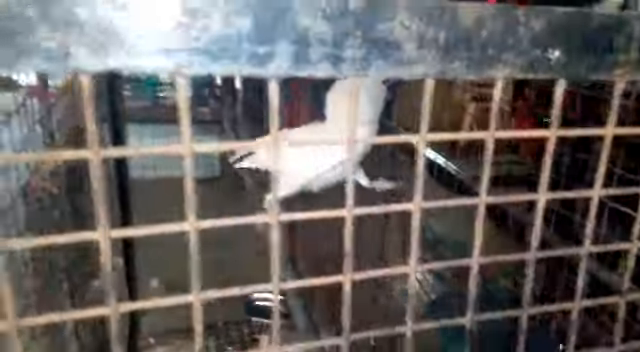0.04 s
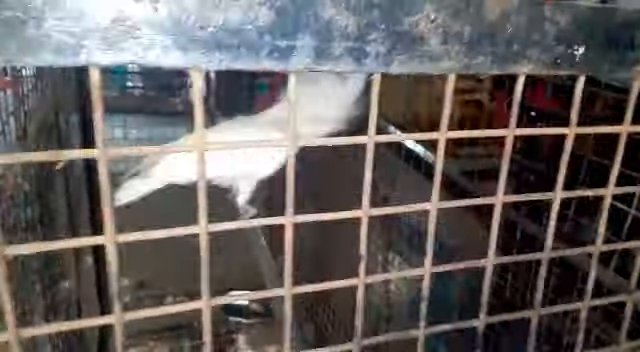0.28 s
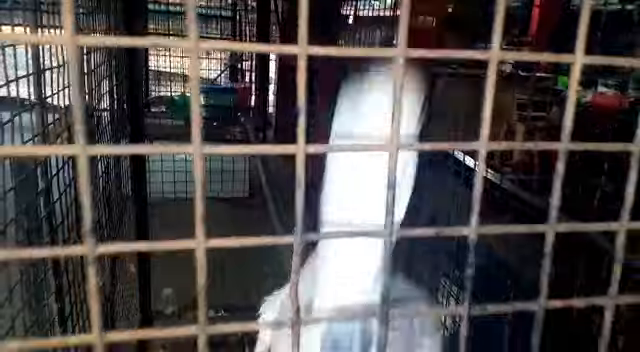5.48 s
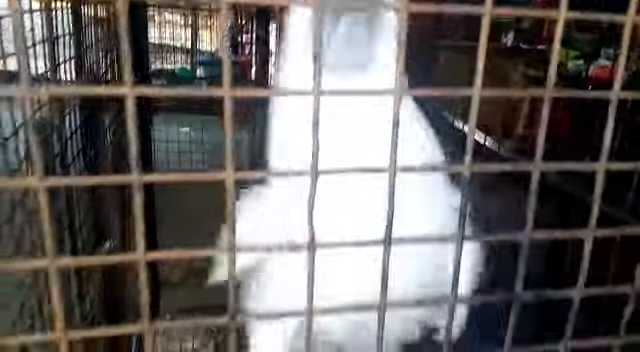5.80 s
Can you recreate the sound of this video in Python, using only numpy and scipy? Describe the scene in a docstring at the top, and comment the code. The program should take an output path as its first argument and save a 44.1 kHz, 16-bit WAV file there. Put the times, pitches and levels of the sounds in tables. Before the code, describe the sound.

Small birds chirp faintly, then a nearby caged cockatoo lets out a run of loud, rasping squawks and a final shriek.

```python
"""Over the steady noise of a hard, echoing room, small birds chirp faintly in the distance.
After a second, a cockatoo in a wire cage close to the microphone screeches ten harsh squawks: membranes
in its voice box slap chaotically, and its throat is more strained each time. The loud calls overload
the recorder, which turns them down and clips their peaks. The bird ends on one clear, arched shriek."""
import sys
import numpy as np
from scipy import signal
from scipy.fft import rfft, irfft
from scipy.io import wavfile
from scipy.ndimage import uniform_filter1d, minimum_filter1d, map_coordinates

SR = 44100
rng = np.random.default_rng(int(sys.argv[2]) if len(sys.argv) > 2 else 0)


def unload_wav(signal):
    """Save mono or channel-first audio to the path in sys.argv[1] as 16-bit WAV at rate SR, clipped to [-1, 1]."""
    wavfile.write(
        sys.argv[1],
        SR,
        np.round(np.clip(np.atleast_2d(signal).T, -1, 1) * 32767).astype(np.int16),
    )


N = 257984


def amp(db):
    """Turn decibels into a number to multiply by."""
    return 10 ** (np.asarray(db) / 20)


def unit(x):
    """Scale a sound to an average (rms) size of 1."""
    return x / np.sqrt(np.mean(x ** 2) + 1e-20)


def along(points, hz):
    """Read between rows of (Hz, value), with octaves evenly spaced."""
    row_hz, values = np.transpose(points)
    return np.interp(np.log(hz + 1), np.log(row_hz), values)


def wobble(rate, n):
    """A smooth random curve of n samples, passing through `rate` random values a second."""
    return map_coordinates(rng.standard_normal(int(n * rate / SR) + 4), [np.arange(n) * rate / SR])


def coloured(x, gain, size=4096):
    """Make each frequency of x louder or softer by gain(Hz)."""
    cepstrum = irfft(np.log(np.maximum(gain(np.fft.rfftfreq(size, 1 / SR)), 1e-6)))
    # this fold makes the filter ring only after a sound, never before it
    cepstrum[1:size // 2] *= 2
    cepstrum[size // 2 + 1:] = 0
    return signal.fftconvolve(x, irfft(np.exp(rfft(cepstrum))))[:len(x)]


# The tone of the background noise. Each row: frequency in Hz, relative level in dB.
NOISE_COLOUR = [(25, -21), (60, -21), (110, 2), (270, -8.5), (420, -7), (700, -2.5), (1000, -11),
                (1550, -12), (1900, -9.5), (2650, -3.5), (2900, 6.5), (3300, -7), (9000, -25.5),
                (11500, -25)]
def room_noise(level_db=-57.5):
    """A faint, steady noise whose level drifts slightly."""
    noise = coloured(rng.standard_normal(N), lambda hz: amp(along(NOISE_COLOUR, hz)))
    return unit(noise) * amp(level_db + wobble(5.33, N))


# The small birds' chirps. Each row: start in seconds, length in seconds, first pitch in Hz,
# last pitch in Hz, relative level in dB.
CHIRPS = [(0, 0.065, 3740, 3530, -49.5), (0.066, 0.079, 4900, 5200, -43.5), (0.1, 0.07, 6500, 6930, -40),
          (0.142, 0.054, 5980, 5640, -49), (0.183, 0.066, 3190, 3250, -48.5),
          (0.287, 0.028, 8860, 10400, -52), (0.358, 0.025, 3070, 3100, -45.5),
          (0.367, 0.043, 4540, 4340, -53.5), (0.48, 0.055, 5600, 5600, -58),
          (0.535, 0.042, 4100, 4060, -55)]
def small_birds(waver=0.0396, overtone_db=-15):
    """Short, wavering whistles, each with a weak tone an octave above."""
    out = np.zeros(N)
    for start, length, from_hz, to_hz, db in CHIRPS:
        n = int(length * SR)
        pitch = np.linspace(from_hz, to_hz, n) * (1 + waver * wobble(904, n))
        phase = 2 * np.pi * np.cumsum(pitch) / SR
        whistle = np.sin(phase) + amp(overtone_db) * np.sin(2 * phase)
        out[round(start * SR):][:n] += amp(db) * unit(np.hanning(n) ** .5 * whistle)
    return out


# How long the room rings. Each row: frequency in Hz, seconds to fade by 60 dB.
RING_TIMES = [(300, 0.53), (2200, 0.68), (5000, 0.51), (10000, 0.39)]
def room_echo(x, build_s=0.0034):
    """The room's echo builds up quickly; each frequency dies away at its own speed."""
    hz, t, noise = signal.stft(rng.standard_normal(SR), SR, nperseg=256)
    fade = amp(-60 * t / along(RING_TIMES, hz)[:, None])
    build = 1 - np.exp(-t / build_s)
    tail = signal.istft(noise * fade * build, SR, nperseg=256)[1]
    return signal.fftconvolve(x, tail / np.linalg.norm(tail))[:N]


def voice_box(n, slap_hz=569, scatter=.14):
    """Membranes slap chaotically: uneven pulses, each with a puff of rushing air."""
    slap_rate = slap_hz * np.exp(.06 * wobble(45, n) + scatter * wobble(700, n))
    cycles = np.cumsum(slap_rate) / SR
    slaps = np.diff(np.floor(cycles), prepend=0) * amp(-wobble(600, n))  # sizes vary by about 1 dB
    puffs = rng.standard_normal(n) * np.cos(np.pi * cycles) ** 2
    return (unit(slaps - slaps.mean()) + unit(puffs)) * amp(-wobble(237.3, n))


# Resonances: the pitches that throat and beak boost. The third is the main one, the fourth is nasal.
# Each row: relaxed pitch in Hz, relaxed level in dB, strained pitch in Hz, strained level in dB,
# width in Hz.
RESONANCES = [(1404, -6, 1207, -20, 207), (1940, -16.5, 1634, -4.5, 366), (2378, -1, 2270, -1, 356),
              (3400, -5.5, 3367, -16, 740), (5160, -7.5, 5030, -8, 943), (9170, -26.5, 7370, -14, 1070),
              (9800, -23, 9420, -25, 940)]
def resonances_at(strain, treble_db, nasal_db, treble_hz=3900):
    """Strain draws every resonance from its relaxed place towards its strained place."""
    relaxed_hz, relaxed_db, strained_hz, strained_db, width = np.transpose(RESONANCES)
    hz = relaxed_hz * (strained_hz / relaxed_hz) ** strain
    db = relaxed_db + (strained_db - relaxed_db) * strain
    db += treble_db / (1 + (treble_hz / hz) ** 6)
    db[3] += nasal_db
    return np.column_stack([hz, db, width])


def throat(hz, resonances, low_hz=1080, high_hz=10700, steep=2.89, chest_db=-31):
    """How much of each frequency the throat passes: steep-sided peaks over a weak, broad low one."""
    power = sum(amp(db) ** 2 / (1 + np.abs(2 * (hz - centre) / width) ** steep)
                for centre, db, width in resonances)
    band = 1 / (1 + (low_hz / (hz + 1)) ** 14) / (1 + (hz / high_hz) ** 50)
    chest = amp(chest_db) ** 2 / (1 + ((hz - 850) / 280) ** 4)
    return np.sqrt(power * band + chest)


def piercing_tone(n, hz, waver=0.01318, shiver=0.0227, fading_db=2, lower_db=-7):
    """The membranes lock onto the main resonance; a weaker tone sounds at 3/4 of its pitch."""
    pitch = hz * (1 + waver * wobble(49.26, n) + shiver * wobble(604.6, n))
    phase = 2 * np.pi * np.cumsum(pitch) / SR
    main, lower = (unit(amp(fading_db * wobble(110.1, n))) for _ in range(2))
    return unit(main * np.sin(phase) + amp(lower_db) * lower * np.sin(phase * 3 / 4))


def roof_echo(x, typical_delay_s=.0031, share=0.43, retreat=0.554):
    """As the head dips, the cage roof's echo comes later, so the pitches it boosts slide down."""
    t = np.arange(len(x)) / SR
    delay = typical_delay_s * (1 + rng.normal(0, 0.0809)) * (1 + retreat * t)
    return x + share * map_coordinates(x, [(t - delay) * SR], order=3)


# The ten squawks. Each row: start in seconds, end in seconds, level in dB, piercing tone against the
# rasp in dB, throat strain from 0 to 1, treble boost in dB, nasal boost in dB.
SQUAWKS = [(1.011, 1.296, -10, -9, 0.07, -3, -1), (1.508, 1.798, -7.5, -10.5, 0.23, -2, 1.5),
           (2.035, 2.305, -6, -25, 0.34, 0.5, -0.5), (2.522, 2.773, -5, -23, 0.4, 1, -4),
           (2.993, 3.238, -3.5, -16, 0.57, -0.5, -2.5), (3.444, 3.655, -2, -15, 0.76, 0.5, 1.5),
           (3.851, 4.076, -2, -13, .83, 0.5, 0.5), (4.275, 4.495, -0.5, -6, .88, 0, 2),
           (4.687, 4.909, -1, -3.5, 0.9, -5.5, 1), (5.123, 5.323, -1, -18, 0.97, -3.5, -8)]
def squawks(scoop=0.11, sag=.016, flutter_db=0.45, onset_db=-21, opening_s=0.00043, release_s=0.027,
            relaxed_swell_s=0.079, strained_swell_s=0.032):
    """Each squawk scoops up as it swells (faster when strained), sinks a little, and is cut off."""
    out, n = np.zeros(N + SR), SR // 2
    t = np.arange(n) / SR
    for start, end, db, tone_db, strain, treble_db, nasal_db in SQUAWKS:
        length = end - start
        resonances = resonances_at(strain, treble_db, nasal_db)
        swell_s = relaxed_swell_s * (strained_swell_s / relaxed_swell_s) ** strain
        swell_left = np.maximum(1 - t / swell_s, 0)
        rasp = unit(coloured(voice_box(n), lambda hz: throat(hz, resonances)))
        tone = amp(tone_db) * piercing_tone(n, resonances[2, 0])
        voice = (rasp + tone) * amp(flutter_db * wobble(66, n))
        # the tightening throat carries pitch and resonances along together
        sinking = sag * (1 - 2 * np.minimum(t / length, 1))
        speed = 1 - scoop * swell_left ** 2 + sinking + .006 * wobble(30.41, n)
        voice = map_coordinates(voice, [np.cumsum(speed)], order=5)
        effort_db = onset_db * swell_left ** 1.16 - 60 * np.maximum(t - length, 0) / release_s
        loudness = amp(db + effort_db) * np.minimum(t / opening_s, 1)
        out[round(start * SR):][:n] += unit(roof_echo(voice)) * loudness
    return out[:N]


def near_walls(x, echo_db=-20, count=9):
    """The walls around the cage add weak, early copies to the sound."""
    out = x.copy()
    for delay_s in rng.uniform(.002, 0.017, count):
        out += amp(echo_db) * rng.choice([-1, 1]) * np.pad(x, (int(delay_s * SR), 0))[:N]
    return out / np.sqrt(1 + count * amp(echo_db) ** 2)


# Where the beak points. Each row: time in seconds, level sent into the room in dB.
FACING = [(1.1, -11), (4.2, -22), (5.2, -22), (5.7, -14.5)]
def beak_turn(x):
    """Less sound goes into the room as the bird turns to the microphone, more as it turns back."""
    return x * amp(np.interp(np.arange(N) / SR, *np.transpose(FACING)))


# The rise and fall of the shriek. Each row: time in seconds, pitch in Hz.
SHRIEK_ARCH = [(5.58, 1824), (5.597, 2106), (5.622, 2267), (5.666, 2295), (5.695, 2387), (5.72, 2167),
               (5.75, 2136), (5.765, 1934), (5.776, 1713)]
# What the throat passes while shrieking. Each row: frequency in Hz, relative level in dB.
SHRIEK_THROAT = [(1100, -68), (1600, -18), (2200, -4.5), (3300, -6), (4100, 1), (4700, 5.5), (5600, -6.5),
                 (6800, -8.5), (8000, -1.5), (9200, -7), (10500, -10), (12000, -19.5), (15000, -23)]
def shriek(start_s=5.577, end_s=5.773, swell_s=0.023, release_s=0.018, crest_s=5.699, crest_half_s=.0324,
           top_db=-5.5, db_per_octave=16, onset_db=-18, warble_hz=78, air_db=-31, hoarse_air_db=25):
    """A clear, arched tone that warbles at its crest and is softer and hoarse at both ends."""
    t = np.arange(N) / SR
    live = (t > start_s) & (t < end_s + release_s)
    t, out = t[live], np.zeros(N)
    arch = np.interp(t, *np.transpose(SHRIEK_ARCH))
    octaves_down = np.log2(arch.max() / arch)
    hoarse = np.tanh(octaves_down / 0.24) ** 2
    crest = 1 / (1 + np.abs((t - crest_s) / crest_half_s) ** 12)
    warble = crest * np.sin(2 * np.pi * warble_hz * t)
    swell_left = np.maximum(1 - (t - start_s) / swell_s, 0)
    effort_db = onset_db * swell_left ** 2 - 60 * np.maximum(t - end_s, 0) / release_s
    db = top_db - db_per_octave * octaves_down + effort_db + 2 * warble
    jitter = (0.00089 + 0.0206 * hoarse) * wobble(830, len(t))
    pitch = arch * (1 + 0.025 * warble + jitter)
    # away from the crest every second vibration differs, adding tones halfway between the overtones
    half_phase = np.pi * np.cumsum(pitch) / SR
    tone = np.zeros(len(t))
    for k in range(2, 14):
        strength = amp(along(SHRIEK_THROAT, k * pitch / 2)) * (1 - crest if k % 2 else 1)
        tone += strength * np.sin(k * half_phase + rng.uniform(0, 2 * np.pi))
    breath = rng.standard_normal(len(t))
    air = coloured(breath, lambda hz: amp(along(SHRIEK_THROAT, hz)) * hz / (hz + 1500))
    out[live] = amp(db) * (unit(tone) + amp(air_db + hoarse_air_db * hoarse) * unit(air))
    return out


def scene():
    """Room noise, the far birds and the near cockatoo, alike in both channels."""
    cockatoo, chirps, noise = squawks() + shriek(), small_birds(), room_noise()
    near = near_walls(cockatoo) + room_echo(beak_turn(cockatoo))
    far = amp(-8) * chirps + amp(-6) * room_echo(chirps)
    mono = noise + far + near
    return np.array([mono, mono])


def limiter(x, ceiling=1.267, recovery_s=0.017):
    """The recorder turns itself down just ahead of each peak and creeps back up."""
    needed = minimum_filter1d(np.log(ceiling / np.maximum(np.abs(x), ceiling)), size=90)
    creep = np.arange(N) / SR / recovery_s
    log_gain = creep + np.minimum.accumulate(needed - creep)
    return x * np.exp(uniform_filter1d(log_gain, size=90))


# How the microphone dulls the treble. Each row: frequency in Hz, level change in dB.
MICROPHONE = [(20, -0.5), (10200, 0), (11300, -2.5), (13000, -6.5), (15500, -12)]
def record(dry, lopsided=0.026, growth=3.6, rumble_hz=230, hardness=9, top_hz=15900):
    """The microphone overloads, the calls are held down and clipped, and the highest treble is cut."""
    mono = dry.mean(axis=0)
    # the overloaded microphone swings unevenly, turning the calls' flutter into a low rumble
    rumble = coloured(np.abs(mono) ** growth,
                      lambda hz: (hz + 1) / np.hypot(hz, 110) / np.sqrt(1 + (hz / rumble_hz) ** 4))
    held = limiter(mono + lopsided * rumble)
    clipped = held / (1 + np.abs(held) ** hardness) ** (1 / hardness)
    hz = np.fft.rfftfreq(N, 1 / SR)
    out = irfft(rfft(clipped) * amp(along(MICROPHONE, hz)) * (hz < top_hz), N)
    return np.array([out, out])


dry = scene()
out = record(dry)
unload_wav(out)
```